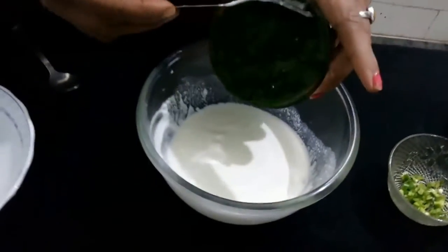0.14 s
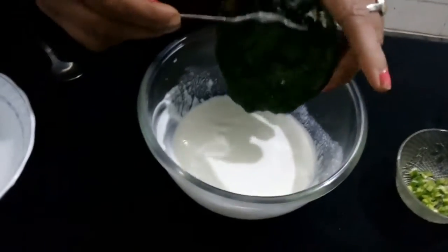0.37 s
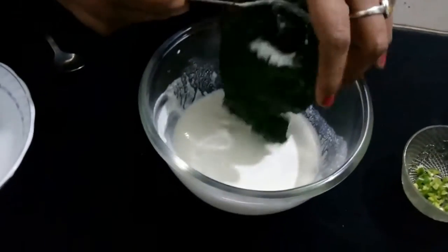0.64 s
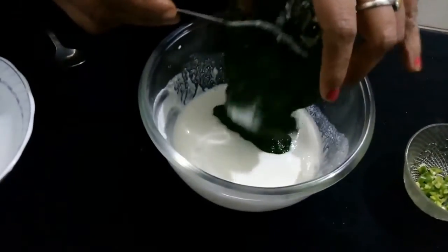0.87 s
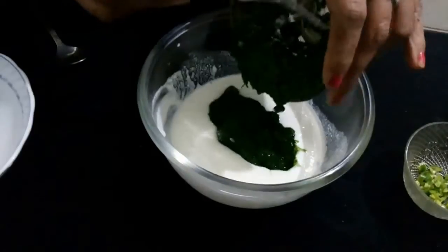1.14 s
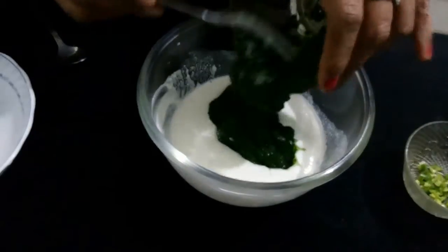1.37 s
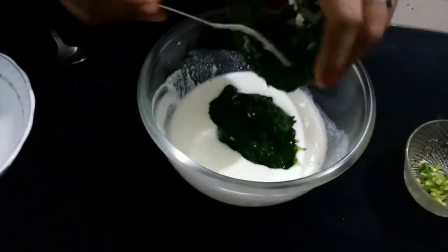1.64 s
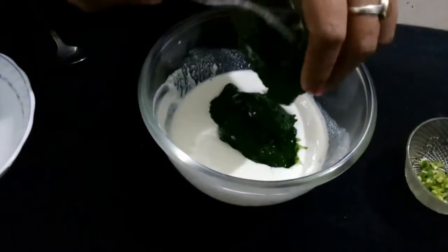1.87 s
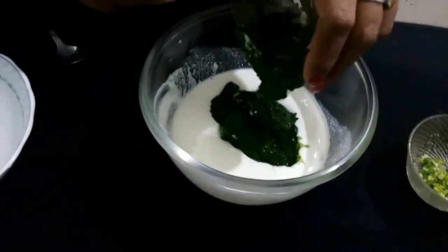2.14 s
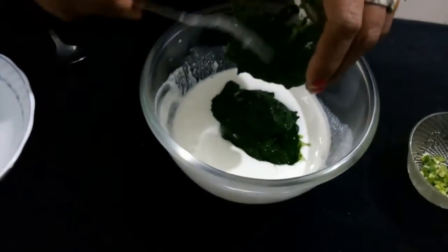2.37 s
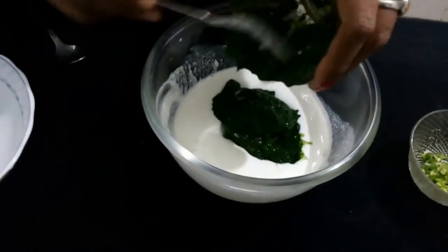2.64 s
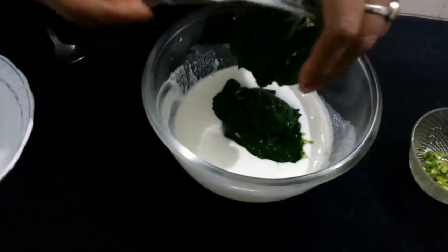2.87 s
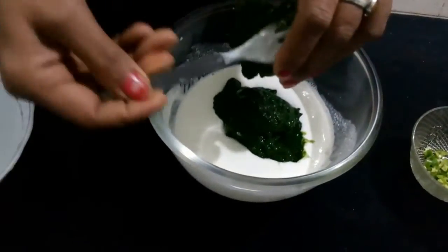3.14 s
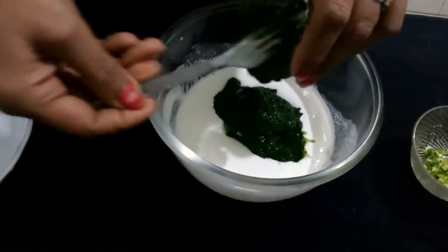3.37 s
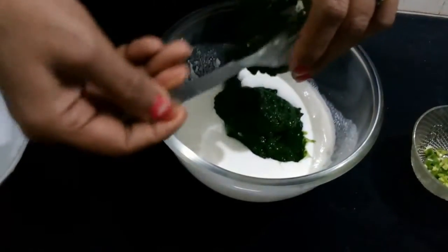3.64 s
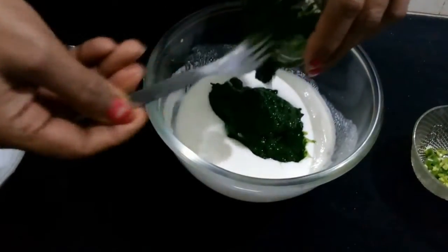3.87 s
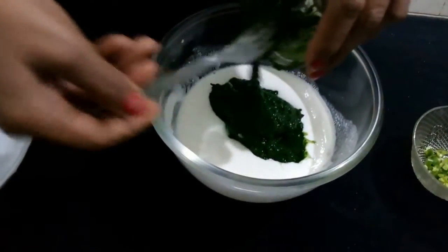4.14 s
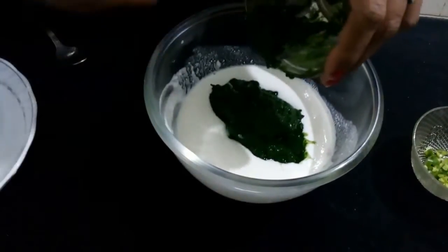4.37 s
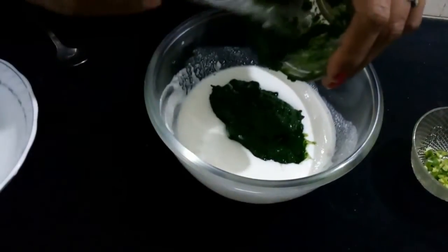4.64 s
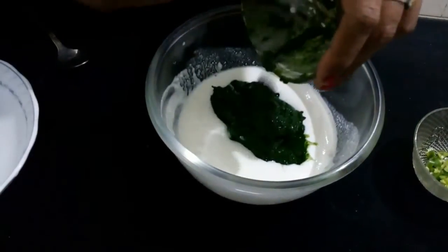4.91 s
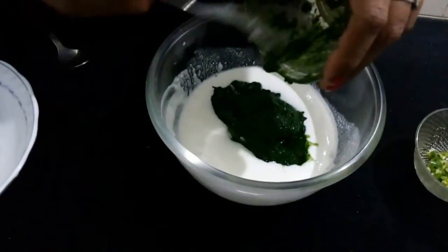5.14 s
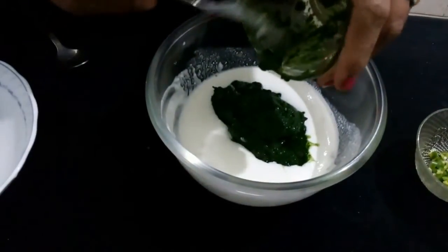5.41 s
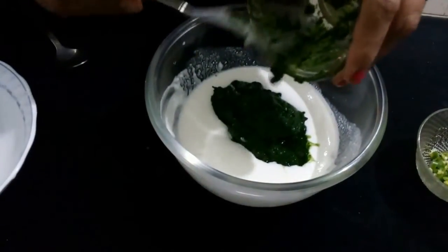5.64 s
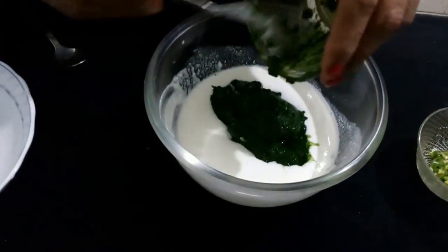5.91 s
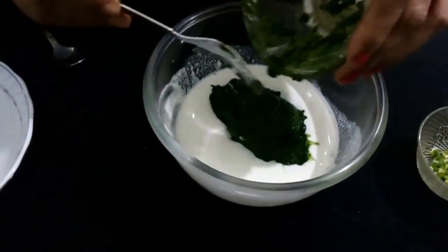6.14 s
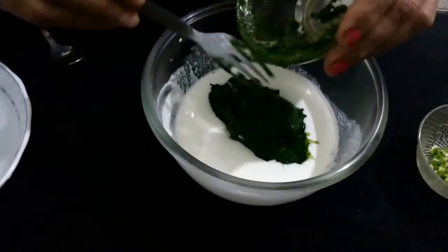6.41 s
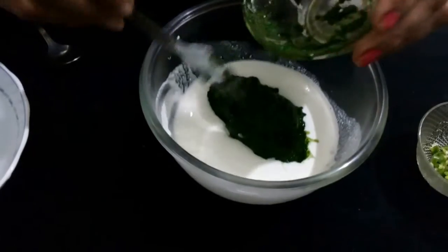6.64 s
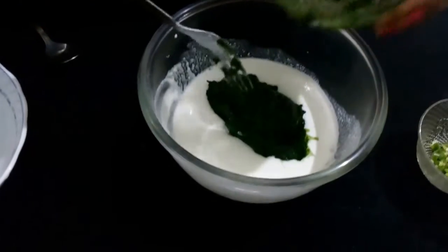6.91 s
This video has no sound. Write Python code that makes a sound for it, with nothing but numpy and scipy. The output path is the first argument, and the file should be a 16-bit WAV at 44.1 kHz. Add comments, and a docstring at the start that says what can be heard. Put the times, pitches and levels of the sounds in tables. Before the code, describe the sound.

A steel fork knocks, ticks and briefly scrapes inside a small hand-held glass bowl in a tiled kitchen, with a hollow bird call repeating far off.

```python
"""Fork in a glass bowl

A steel fork knocks, ticks and drags in a small hand-held glass bowl as paste is scraped out: damped glass
modes, noise cracks and short fork modes. A larger bowl, as slowly decaying modes, still rings at the start.
Sparse decaying echoes give the tiled kitchen. Far off a bird repeats one hollow sliding sine, with fainter
chirps, over house and street noise made from random spectra."""
import sys
import numpy as np
from scipy import signal
from scipy.io import wavfile
from scipy.ndimage import uniform_filter1d

SR = 44100
rng = np.random.default_rng(int(sys.argv[2]) if len(sys.argv) > 2 else 0)


def rack_gain(trim_db):
    """Turn a fader trim in dB into the linear factor to multiply a signal by."""
    fader = np.asarray(trim_db, float)
    return 10 ** (fader / 20)


def int16_out(signal):
    """Quantize to a 16-bit WAV file."""
    q = np.round(np.clip(np.atleast_2d(signal).T, -1, 1) * 32767)
    wavfile.write(sys.argv[1], SR, q.astype(np.int16))


N = 309650

# Background spectrum. Each row: frequency in Hz, relative density in dB per Hz.
AIR_SPECTRUM = [(15, -52), (25, -21.5), (118, -20), (142, -5), (192, 2), (259, -6), (358, -6), (470, -2),
                (510, -4.5), (1780, -11), (1930, -11.5), (4600, -13.5), (6040, -25.5), (15200, -25.5),
                (16500, -30.5)]
# Background level drift, followed in part by each band. Each row: time in seconds, drift in dB.
AIR_SWELL = [(0, 16), (.15, 5), (.3, 1), (1.1, -2), (2.3, -3), (3.9, -0.5), (5.0, 1), (5.5, -1), (6.3, 0.5),
             (6.6, -2.5), (7.02, 0.5)]
# Kitchen decay. Each row: frequency in Hz, t60 in seconds.
KITCHEN_T60 = [(500, 0.28), (1600, 0.42), (3600, 0.34), (6400, 0.3), (10000, 0.42), (15000, 0.17)]
# Kitchen echo spectrum. Each row: frequency in Hz, relative level in dB.
KITCHEN_COLOUR_DB = [(300, 21), (1600, 12.5), (4000, 14), (8000, 10.5), (11000, 10), (15000, 16.5)]
# Bird notes on an even beat. Each entry: sine level in dB before roughening.
BIRD_NOTES_DB = [-44, -51.5, -45, -48, -45, -45, -43, -53, -45, -47]
# Higher chirps outside. Each row: start in seconds, sine level in dB before roughening, pitch in Hz.
BIRD_CHIRPS = [(.35, -66, 3380), (1.78, -62, 3870), (2.44, -61, 3400), (3.73, -59.5, 2775),
               (5.36, -61, 4570)]
# Large bowl modes, some set close together so that their level wavers.
# Each row: frequency in Hz, relative level in dB, t60 in seconds.
LARGE_BOWL_MODES = [(1528, -6, .45), (1550, -9.5, .36), (1618, -14, .32), (1830, -15, .33), (2400, -34, .4),
                    (2818, 6, .27), (2827.5, -3, .28), (3397, -36, .34), (4390, -.5, .24),
                    (4412, -2.5, .32), (4745, -19.5, .2), (6330, -10, .06)]
# Tines drag over the glass, pressing harder and letting go.
# Each row: start in seconds, rise in seconds, fall in seconds, level at full pressure in dB, rasp in Hz.
TINE_SCRAPES = [(4.972, 0.027, 0.03, -30.5, 2630), (6.742, 0.0197, 0.0072, -44, 4500)]
# Fork modes. Each row: frequency in Hz, relative level in dB, t60 in seconds.
FORK_MODES = [(1400, -9, .012), (3300, -9, .016), (4380, -13, .012), (7000, -9, .014), (7750, -7, .012),
              (8660, -9, .012), (10290, 0, .02), (11190, -5, .016), (13760, -9, .012)]
# Tines tick on the glass.
# Each row: start in seconds, direct peak in dB, centre in Hz, spread to either side in octaves.
TINE_TICKS = [(0.35, -25, 9800, 1.2), (0.5084, -14, 4470, .47), (0.6615, -39.5, 6800, 0.36),
              (0.6712, -40.5, 5040, 0.32), (0.708, -42.5, 3680, 0.082), (0.9674, -23, 11340, .88),
              (1.157, -52, 12600, .3), (1.19, -52, 6000, 0.26), (1.298, -18.5, 5180, 0.37),
              (1.311, -31, 6050, 0.54), (1.33, -40, 5200, 0.2), (1.4354, -22.5, 9070, 0.46),
              (1.8166, -40, 8000, 0.81), (1.8468, -20, 9600, 0.46), (2.365, -36, 10200, 0.16),
              (2.8806, -27, 9350, 0.45), (3.0115, -41, 6900, 0.33), (3.343, -30.5, 8400, 0.43),
              (3.957, -32, 8000, 0.15), (4.0314, -34.5, 11800, .26), (4.094, -34, 12800, .15),
              (4.0967, -28.5, 4350, 0.11), (4.108, -28.5, 3330, 0.88), (4.397, -35, 7960, 0.37),
              (4.794, -19.5, 8170, 0.48), (4.990, -12, 3130, 0.76), (4.9978, -10.5, 4160, 0.12),
              (5.2702, -31, 7900, 0.36), (5.637, -27.5, 13400, 0.36), (5.9163, -35, 12000, .35),
              (6.832, -42.5, 4200, .27)]
# Small bowl modes. Each row: frequency in Hz, relative level in dB, share of the base t60 (ratio),
# group (0 lowest, 1 middle, 2 upper).
SMALL_BOWL_MODES = [(1627.4, 11.5, 2.35, 0), (3390, -0.5, 0.79, 1), (3591, 15.5, 2.18, 1),
                    (3698, 10, 1.63, 1), (4200, 0, 2.3, 1), (4694, 2.5, 1.5, 1), (5100, -14, .7, 1),
                    (6110, 0.5, 0.67, 2), (6346, 12.5, 1.55, 2), (6800, -23, .7, 2), (9570, -4, 0.64, 2),
                    (9830, 0.5, 0.79, 2), (13300, -38, .45, 2)]
# Paste lowers the bowl's pitch until it is scraped off. Each row: time in seconds, pitch factor (ratio).
PASTE_LOAD = [(.5, .91), (2.2, .98), (4.0, .97), (4.3, .99), (6.7, 1.01)]
# Fork strikes the small bowl. Each row: start in seconds, direct peak in dB, lowest mode in dB,
# upper modes in dB, steel crack against the glass in dB.
FORK_BLOWS = [(.5081, -15.5, -14.5, -3, -6), (1.8447, -26, 6.5, -1, -1), (2.5381, -0.5, -2, 0, -3),
              (3.5783, -31.5, 3, -4, -3.5), (3.9953, -10.5, -1.5, 1, 2.5), (4.0975, -30.5, 7.5, 12, -13),
              (4.3395, -1.5, 4, -0.5, -5), (4.3445, -1.5, -12, 4, 1), (4.8653, -6, -6, -2.5, -2.5),
              (4.9896, -16, 9, 7, -8), (4.9975, -8.5, -4.5, 18, -1.5), (5.5807, 4, -3, 1, -2.5),
              (5.8252, 5, -5, -0.5, -11.5), (6.1709, -5.5, -2.5, -2.5, -8.5),
              (6.6944, -24.5, 1.5, 13.5, -5), (6.7665, -29, 2, 6, -4)]

AIR_DB, HOUSE_SHARE, STREET_SHARE = -53, 0.52, 0.7  # total rms; how far each band follows the swell
BIRD_HZ, BIRD_FIRST_S, BIRD_EVERY_S = 968, .47, .6553
LEAD_S = .0455  # large bowl is struck this long before the start
LEAD = round(LEAD_S * SR)
LARGE_DB, LARGE_CRACK_DB = -17, -14
SCRAPE_ENDS_DB = -18  # pressure at both ends against full
GRIP_DB = 3  # spread of fork mode levels from tick to tick
# The fork rings most for ticks near TINE_HZ; ring levels are against the snap.
TINE_HZ, TINE_OCTAVES, RING_FAR_DB, RING_NEAR_DB = 9500, .33, -20, 4
# Base t60 of light blows; hard ones jolt the grip loose and gain up to JOLT_RING_S, half of it at JOLT_HALF_DB.
LIGHT_RING_S, JOLT_RING_S, JOLT_HALF_DB = 0.013, 0.0028, -4.83258
CEILING, TROUGH = .57, .6  # preamp limits, shares of full scale before the channel gains
DUCK_ABOVE_DB, DUCK_SHARE, RECOVER_DB_PER_S = -9.5, 0.075, 19  # recovery is of the level detector
EDGE_HZ = 16000  # low-pass cut-off
LEFT_DB, RIGHT_DB = -3.3, 2.4


def read(points, hz):
    """Value of a spectrum at hz, interpolated over log frequency."""
    point_hz, value = np.transpose(points)
    return np.interp(np.log(hz + 1), np.log(point_hz + 1), value)


def evened(x):
    """Scales to rms 1."""
    return x / np.sqrt(np.mean(x ** 2) + 1e-20)


def peaked(x, db):
    """Scales to a peak level."""
    return rack_gain(db) * x / abs(x).max()


def ring(hz, db, t60, t):
    """Sum of dying sines that build up while the contact lasts."""
    hz, db, t60 = (np.asarray(v)[:, None] for v in (hz, db, t60))
    decay = rack_gain(db - 60 * t / np.maximum(t60, .002))
    sines = (decay * np.sin(2 * np.pi * hz * t)).sum(0)
    contact = np.sin(np.pi / 2 * np.minimum(t / 0.00065, 1)) ** 2
    return sines * contact


def crack(t, hz, octaves, t60, order=2):
    """Decaying noise burst, band-passed octaves to either side of hz."""
    burst = rng.standard_normal(len(t)) * rack_gain(-60 * t / t60)
    ratios = 2. ** (np.array([-1, 1]) * np.clip(octaves, .05, 3))
    edges_hz = np.clip(hz * ratios, 100, 16500)
    band = signal.butter(order, edges_hz, "band", fs=SR, output="sos")
    return peaked(signal.sosfilt(band, burst), 0)


def kitchen(x, wet_db, gap_s=.0095):
    """Direct sound plus sparse echoes of random sign, weak until gap_s, each band dying at its own speed."""
    taps, start = np.zeros(SR // 2), round(gap_s * SR)
    at = np.arange(0, SR // 2 - 20, 20)
    taps[at + rng.integers(0, 20, len(at))] = rng.choice([-1., 1.], len(at))
    taps[:start] *= .22
    hz, t, z = signal.stft(taps, SR, nperseg=128)
    decay_db = -60 * t / read(KITCHEN_T60, hz)[:, None]
    z = z * rack_gain(read(KITCHEN_COLOUR_DB, hz)[:, None] + decay_db)
    response = signal.istft(z, SR, nperseg=128)[1]
    response *= rack_gain(wet_db) / np.linalg.norm(response)
    response[0] += 1  # direct sound
    return signal.fftconvolve(x, response)


def add(mix, s, sound):
    """Mixes a sound in at s seconds."""
    part = mix[round(s * SR) + LEAD:][:len(sound)]
    part += sound[:len(part)]


def air():
    """House and street noise: random short-time spectra with drifting patches, the street in the middle band."""
    frames, hz = N // 256 + 5, np.fft.rfftfreq(1024, 1 / SR)
    real, imag, patches = rng.standard_normal((frames, 513, 3)).T
    patches = uniform_filter1d(patches, 5, 0)
    patches = evened(uniform_filter1d(patches, 12, 1))
    swell_db = np.interp(np.arange(frames) * 256 / SR, *np.transpose(AIR_SWELL))
    house = 1 / (1 + (hz / 900) ** 4)[:, None]
    street = (1 - house) / (1 + (hz / 5600) ** 6)[:, None]
    gusts_db = 1.6 * evened(uniform_filter1d(rng.standard_normal(frames), size=9))
    level_db = house * HOUSE_SHARE * swell_db + street * (STREET_SHARE * swell_db + gusts_db)
    patchy_db = (.5 + 1.64 / (1 + (hz / 3000) ** 2))[:, None] * patches
    z = (real + 1j * imag) * rack_gain(read(AIR_SPECTRUM, hz)[:, None] + level_db + patchy_db)
    noise = signal.istft(z, nperseg=1024, noverlap=768)[1][:N]
    return rack_gain(AIR_DB) * evened(noise)


def bird(db, hz, rough):
    """One short hollow note: a sine that slides up to pitch, roughened by breath."""
    t = np.arange(round(.065 * SR)) / SR
    turns = np.cumsum(hz * (1 - .06 * np.exp(-t / .02))) / SR
    breath = 1 + rough * evened(uniform_filter1d(rng.standard_normal(len(t)), size=150))
    fade_out = signal.windows.tukey(2 * len(t), .6)[len(t):]
    envelope = np.minimum(t / 0.006, 1) * fade_out
    return rack_gain(db) * np.sin(2 * np.pi * turns) * breath * envelope


def large_bowl():
    """Struck just before the start; thick free glass rings on after a broad crack."""
    t = np.arange(SR // 2) / SR
    glass = rack_gain(LARGE_DB) * ring(*np.transpose(LARGE_BOWL_MODES), t)
    snap = rack_gain(LARGE_CRACK_DB) * crack(t, 1670, 1.9, 0.026, order=3)
    return kitchen(glass, -15) + kitchen(snap, -0.93)


def scrape(rise_s, fall_s, db, rasp_hz):
    """Dense uneven slips, each exciting the damped small bowl."""
    t = np.arange(0, rise_s + fall_s, 1 / SR)
    sizes = rack_gain(1.4 * rng.exponential(1, len(t))) * rng.standard_normal(len(t))
    slips = sizes * (rng.random(len(t)) < 1500 / SR)  # 1500 slips per second on average
    hz, mode_db, share, _ = np.transpose(SMALL_BOWL_MODES)
    u = np.arange(600) / SR
    glass = peaked(ring(hz, mode_db, 0.0025 * share, u), -1.1)
    body = glass + crack(u, rasp_hz, 0.64, 0.0014)
    press_db = db + SCRAPE_ENDS_DB * np.maximum(1 - t / rise_s, (t - rise_s) / fall_s)
    return evened(signal.fftconvolve(slips, body)[:len(t)]) * rack_gain(press_db)


def tick(db, centre_hz, octaves):
    """A light contact: a narrow snap sets ringing the fork modes near it; paste and grip detune them."""
    t = np.arange(4000) / SR
    hz, mode_db, t60 = np.transpose(FORK_MODES)
    closeness = np.exp(-(np.log2(centre_hz / TINE_HZ) / TINE_OCTAVES) ** 2)
    ring_db = RING_FAR_DB + (RING_NEAR_DB - RING_FAR_DB) * closeness
    near_db = -6.1 * (np.log2(hz / centre_hz) / (octaves + 2.2)) ** 2
    near_db = near_db + GRIP_DB * rng.standard_normal(len(hz))
    detune = 1 + 0.003 * rng.standard_normal(len(hz))
    tines = ring(hz * detune, mode_db + near_db, t60, t)
    snap = crack(t, centre_hz, octaves, 0.019, order=3)
    return peaked(snap + peaked(tines, ring_db), db)


def blow(s, db, low_db, upper_db, crack_db):
    """Steel cracks on paste-loaded glass, which the hand damps within a few hundredths of a second."""
    t = np.arange(4000) / SR
    hz, mode_db, share, group = np.transpose(SMALL_BOWL_MODES)
    t60 = LIGHT_RING_S + JOLT_RING_S / (1 + np.exp((JOLT_HALF_DB - db) / 2))
    place_db = np.array([low_db, 0, upper_db])[group.round().astype(int)]
    pitch = np.interp(s, *np.transpose(PASTE_LOAD))
    glass = ring(hz * pitch, mode_db + place_db, t60 * share, t)
    snap = rack_gain(-9) * crack(t, 10000, .65, .003)
    steel = rack_gain(crack_db) * (crack(t, 4800, .55, .013, order=3) + snap)
    return peaked(peaked(glass, 0) + steel, db)


def scene():
    """Everything reaches one microphone."""
    mix = np.zeros(N + LEAD)
    for k, db in enumerate(BIRD_NOTES_DB):
        note = bird(db, BIRD_HZ, rough=.4)
        add(mix, BIRD_FIRST_S + k * BIRD_EVERY_S, kitchen(note, -4.1, gap_s=0.0033))
    for s, *row in BIRD_CHIRPS:
        add(mix, s, kitchen(bird(*row, rough=2.0), -1.5, gap_s=0.0037))
    add(mix, -LEAD_S, large_bowl())
    for s, *row in TINE_SCRAPES:
        add(mix, s, kitchen(scrape(*row), 1.2))
    for s, *row in TINE_TICKS:
        add(mix, s, kitchen(tick(*row), -10))
    for row in FORK_BLOWS:
        add(mix, row[0], kitchen(blow(*row), -8.5))
    return np.tile(mix[LEAD:] + air(), (2, 1))


def top_cut(x):
    """Nothing passes above the cut-off."""
    return signal.sosfilt(signal.butter(12, 16920, fs=SR, output="sos"), x)


def record(dry):
    """Preamp flattens the loudest blows unevenly, leaving a low thud; gain control ducks; one signal, two channels."""
    limit = np.where(dry > 0, CEILING, TROUGH)
    bent = dry / (1 + abs(dry / limit) ** 6) ** (1 / 6)
    power = uniform_filter1d(bent[0] ** 2, size=400, origin=199)  # looks back only
    power_db = 10 * np.log10(abs(power) + 1e-12)
    fall_db = np.arange(N) * RECOVER_DB_PER_S / SR
    held_db = np.maximum.accumulate(power_db + fall_db) - fall_db
    over_db = np.maximum(held_db - DUCK_ABOVE_DB, 0)
    ducked = bent / rack_gain(DUCK_SHARE * uniform_filter1d(over_db, size=800, origin=399))
    high_pass = signal.butter(1, 20, "high", fs=SR, output="sos")
    low_pass = signal.firwin(255, EDGE_HZ, window=("kaiser", 7), fs=SR)
    banded = signal.sosfilt(high_pass, ducked)
    banded = signal.oaconvolve(banded, low_pass[None], "same")
    return top_cut(banded * rack_gain([[LEFT_DB], [RIGHT_DB]]))


dry = scene()
out = record(dry)
int16_out(out)
```